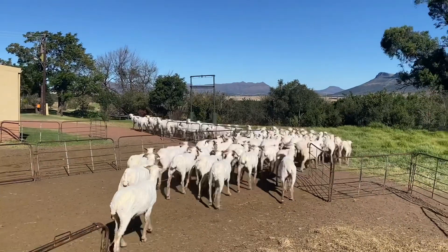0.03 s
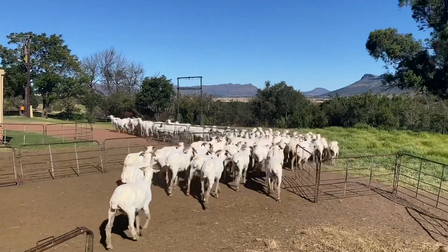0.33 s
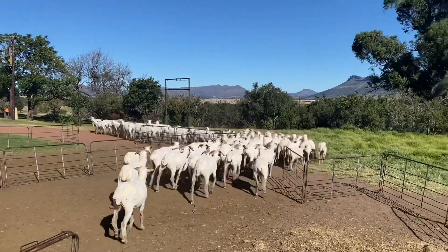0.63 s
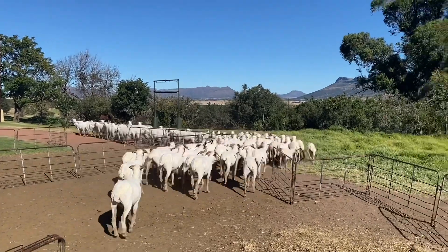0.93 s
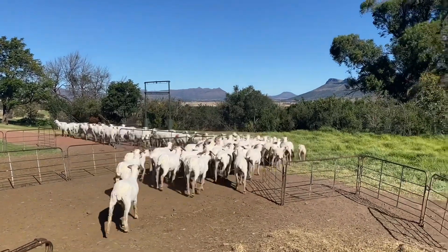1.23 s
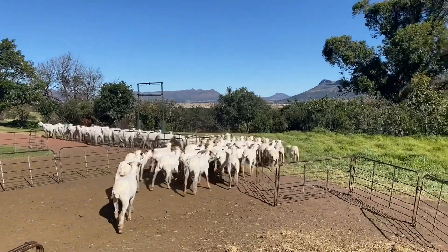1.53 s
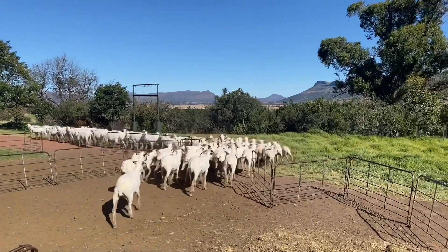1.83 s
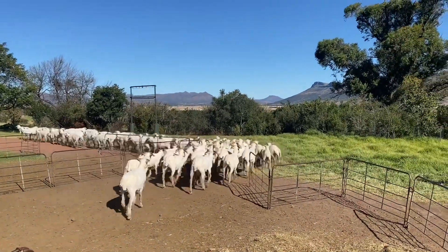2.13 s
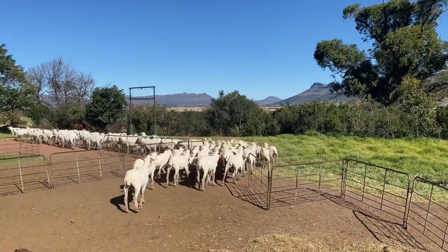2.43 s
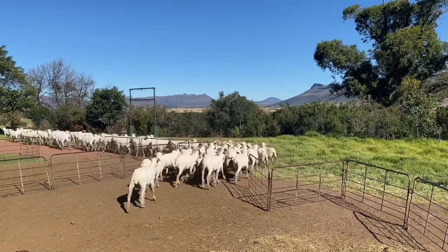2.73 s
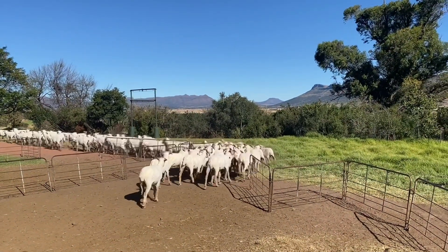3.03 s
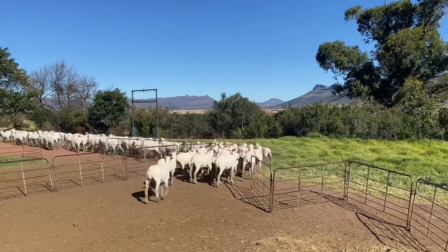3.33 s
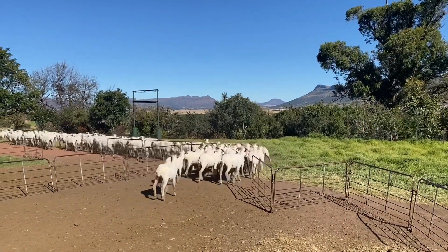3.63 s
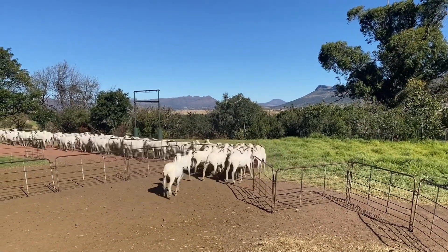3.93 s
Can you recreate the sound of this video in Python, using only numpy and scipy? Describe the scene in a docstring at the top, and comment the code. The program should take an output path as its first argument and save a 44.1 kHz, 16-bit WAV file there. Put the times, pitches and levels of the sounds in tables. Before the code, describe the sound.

A flock of sheep trots off faintly, a steel fence clanking as wind rumbles.

```python
"""A flock of sheep trots away over a dry dirt farmyard, in a faint outdoor hiss and a light wind.
In about the first second, near hooves scuff up grit and the steel fence clanks as the sheep jostle it.
By two seconds the patter has sunk into the hiss; a few scuffs, knocks and pebble ticks still follow.
The wind buffets the microphone throughout and is strongest after three seconds: a low rumble and
eddies (puffs of wind), each a soft thump that falls in pitch."""
import sys
import numpy as np
from scipy import signal
from scipy.fft import rfft, irfft
from scipy.io import wavfile
from scipy.ndimage import uniform_filter1d

SR = 44100
rng = np.random.default_rng(int(sys.argv[2]) if len(sys.argv) > 2 else 0)


def unload_wav(signal):
    """Save mono or channel-first audio to the path in sys.argv[1] as 16-bit WAV at rate SR, clipped to [-1, 1]."""
    wavfile.write(
        sys.argv[1],
        SR,
        np.round(np.clip(np.atleast_2d(signal).T, -1, 1) * 32767).astype(np.int16),
    )


N = 176400
TIME = np.arange(N) / SR


def from_db(db):
    """Turn decibels into a number to multiply by."""
    return 10 ** (np.asarray(db) / 20)


def rms_one(x):
    """Scale a sound to an average power of one."""
    return x / np.sqrt(np.mean(x ** 2) + 1e-20)


def steady(x):
    """Even out the loudness, so that every 50 ms has a power near one."""
    return x / np.sqrt(uniform_filter1d(x ** 2, size=2200) + 1e-20)


def in_time(rows):
    """A volume curve through points of t/s, level/dB."""
    return from_db(np.interp(TIME, *np.transpose(rows)))


def colour(x, points):
    """Shape the tone along a curve of f/Hz, level/dB."""
    hz, db = np.transpose(points)
    bins = np.maximum(np.fft.rfftfreq(N, 1 / SR), 1)
    return irfft(rfft(x) * from_db(np.interp(np.log(bins), np.log(hz), db)), N)


def tremble():
    """A random wobble of typical size one, some tens of times a second."""
    return rms_one(colour(rng.standard_normal(N), [(15, -30), (35, 0), (70, 0), (280, -110)]))


def burst(start, attack, t60):
    """A volume curve that rises straight, then fades by 60 dB in t60 seconds."""
    age = TIME - start
    return np.clip(age / attack, 0, 1) * from_db(-60 * np.clip((age - attack) / t60, 0, 2))


# how much left and right differ (side) against what they share (mid): f/Hz, level/dB
WIDTH = [(60, -43), (250, -33), (700, -1), (1300, -1), (2400, -3), (4400, -8), (6000, -10.5), (8000, 1.5),
         (11000, -3.5), (15000, 2.5)]
def stereo_noise(spectrum):
    """Shaped noise, as wide as the open yard is at each frequency."""
    mid, side = (rms_one(colour(white, spectrum)) for white in rng.standard_normal((2, N)))
    return mid + colour(side, WIDTH) * np.array([[1], [-1]])


# tone of the open air and of a thin hiss above it: f/Hz, level/dB
AIR_TONE = [(25, 1), (80, 18.5), (200, 12.5), (450, 5.5), (850, 8.5), (1100, 4), (1400, 3.5), (1700, -1.5),
            (2100, 3.5), (2900, -4.5), (4400, -0.5), (6000, -3), (7500, -5.5), (11000, -8.5), (15500, -7)]
HISS_TONE = [(2800, -7), (4600, 7), (6000, 0), (7500, 3), (11000, 2.5), (15500, 0)]
# loudness of the thin hiss: t/s, level/dB
HISS_LEVEL = [(0, -70), (.3, -89), (.36, -74), (.55, -83), (1.2, -84), (1.42, -72), (1.55, -76),
              (1.77, -71.5), (1.95, -76), (2.2, -78), (2.55, -73), (2.8, -95), (4, -89)]
def open_air(air_db=-68, flicker_db=2):
    """A steady outdoor hush, and a thin hiss that flickers as it comes and goes."""
    hush = from_db(air_db) * stereo_noise(AIR_TONE)
    flicker = from_db(flicker_db * tremble())
    return hush + in_time(HISS_LEVEL) * flicker * stereo_noise(HISS_TONE)


EDDY_LEAD = 256   # samples of room before an eddy begins
def eddy(top_hz, low_hz, cycles=1.45, rise=1.94, fall=3.86):
    """One wind puff on the microphone, a soft thump falling in pitch."""
    hz = cycles * SR / np.arange(1, 8192)   # pitch is cycles divided by age
    # it swells as the pitch drops past top_hz and fades below low_hz
    swell = np.exp(-.5 * (hz / top_hz) ** rise) / (1 + (low_hz / hz) ** (2 * fall)) ** .5
    # complex numbers let it start anywhere in its wave
    thump = swell / swell.max() * np.exp(-2j * np.pi * cycles * np.log(hz))
    treble_cut = signal.butter(4, 1.407 * top_hz, fs=SR, output="sos")
    return signal.sosfiltfilt(treble_cut, np.pad(thump, (EDDY_LEAD, 0)))


# tone of the wind's rumble: f/Hz, level/dB
RUMBLE_TONE = [(20, -23), (32, -7.5), (45, 2), (68, 5.5), (100, -2), (160, -14), (300, -33), (600, -47),
               (1200, -80)]
def turbulence(rumble_db=-4, eddies_db=-13, spread_db=8, each_size_per_s=35):
    """Churning air at steady strength: a rumble and a stream of small eddies in three sizes."""
    rumble = steady(colour(rng.standard_normal(N), RUMBLE_TONE))
    stream = 0
    for scale in (.5, 1, np.sqrt(2)):
        born = rng.random(N) < each_size_per_s / SR
        strengths = from_db(spread_db * rng.standard_normal(N))
        phases = np.exp(2j * np.pi * rng.random(N))
        thump = eddy(top_hz=331 * scale, low_hz=114 * scale)
        stream += signal.fftconvolve(born * strengths * phases, thump)[:N].real / scale
    return from_db(rumble_db) * rumble + from_db(eddies_db) * rms_one(stream)


# tone of the wind's flutter: f/Hz, level/dB
FLUTTER_TONE = [(120, -3.5), (230, 3), (330, -0.5), (450, -6.5), (600, -11.5), (750, -27.5), (1100, -37),
                (2000, -107)]
# its loudness: t/s, level/dB
FLUTTER_LEVEL = [(0, -77), (.11, -66), (.15, -53.5), (.2, -65.5), (.45, -74), (.49, -44.5), (.54, -69),
                 (1.25, -75.5), (1.39, -56.5), (1.47, -70), (1.6, -61.5), (1.92, -67.5), (2.04, -66.5),
                 (2.1, -68), (2.4, -73), (2.56, -59.5), (2.7, -51), (2.86, -65.5), (3.05, -62), (3.14, -46),
                 (3.2, -41.5), (3.27, -52), (3.42, -52), (3.53, -44), (3.6, -40), (3.71, -54), (3.9, -63),
                 (4, -61.5)]
def flutter(lump_db=3):
    """Fine, fast, lumpy churning in the stronger gusts."""
    lumps = from_db(lump_db * tremble())
    return in_time(FLUTTER_LEVEL) * steady(lumps * colour(rng.standard_normal(N), FLUTTER_TONE))


# strong eddies: t/s, level/dB, starting f/Hz, ending f/Hz
EDDIES = [(0.14, -36, 540, 188), (0.153, -33, 356, 88), (.335, -44, 320, 130), (.380, -43, 260, 101),
          (.476, -31.5, 423, 88), (0.489, -33.5, 505, 222), (.500, -32.5, 260, 64.4),
          (0.54, -25, 285, 80.5), (0.611, -34.5, 148, 65.3), (0.646, -44.5, 343, 150),
          (0.666, -34.5, 140, 56.6), (0.824, -51, 328, 150), (0.873, -37.5, 107, 55),
          (0.716, -41.5, 330, 102), (1.054, -44, 335, 89), (1.295, -49.5, 348, 150),
          (1.354, -35, 188, 58.5), (1.406, -37.5, 284, 112), (1.534, -40.5, 290, 117),
          (1.586, -37.5, 228, 71.4), (1.646, -41.5, 234, 87), (1.987, -39.5, 246, 92),
          (2.018, -33, 320, 70), (2.038, -34, 356, 72), (2.128, -43.5, 340, 117), (2.352, -31.5, 310, 76.4),
          (2.385, -31.5, 280, 92), (2.445, -37, 226, 93.5), (2.542, -36.5, 360, 132),
          (2.579, -34.5, 355, 84), (2.605, -40, 382, 110), (2.639, -31.5, 200, 84), (2.674, -33, 353, 135),
          (2.69, -30.5, 373, 100), (2.74, -45, 398, 140), (3.094, -35.5, 346, 126), (2.784, -28, 430, 195),
          (2.806, -34.5, 467, 89), (3.125, -33.5, 584, 200), (3.136, -35, 484, 171), (3.145, -30, 600, 110),
          (3.182, -19, 514, 98), (3.202, -31, 636, 205), (3.241, -30, 267, 57.4), (3.262, -40.5, 200, 70.4),
          (3.305, -31, 286, 92.5), (3.337, -39, 357, 110), (3.393, -43, 457, 159), (3.436, -35.5, 450, 100),
          (3.474, -32, 470, 112), (3.487, -33.5, 418, 112), (3.518, -22.5, 358, 84), (3.535, -27, 360, 119),
          (3.565, -31, 550, 443), (3.586, -25, 292, 109), (3.592, -21, 395, 140), (3.633, -31.5, 565, 150),
          (3.683, -33.5, 390, 110), (3.700, -31.5, 132, 60), (3.758, -37, 466, 136), (3.799, -26, 90, 56),
          (3.953, -38, 214, 77.5)]
def eddy_thumps(ragged=0.2):
    """Single strong eddies thump on the microphone, their pressure trembling."""
    thumps = np.zeros(N, complex)
    for s, db, top_hz, low_hz in EDDIES:
        start = int(s * SR) - EDDY_LEAD
        phase = np.exp(2j * np.pi * rng.random())
        thump = phase * eddy(top_hz, low_hz)[:N - start]
        thumps[start:start + len(thump)] += from_db(db) * thump
    return thumps * (1 + ragged * (tremble() + 1j * tremble()))


# strength of the gusts, and how unlike the wind is on left and right: t/s, level/dB
GUST_LEVEL = [(0.0, -56), (0.19, -38.5), (0.29, -54.5), (0.56, -32), (0.59, -46), (0.76, -39), (0.8, -56),
              (0.9, -39.5), (1.06, -53.5), (1.09, -43), (1.15, -51.5), (1.32, -52.5), (1.38, -36),
              (1.5, -58), (1.59, -39), (1.95, -56.5), (2.04, -32.5), (2.15, -47), (2.32, -55.5),
              (2.36, -40), (2.56, -39), (2.6, -36), (3.05, -44), (3.21, -29), (3.23, -36.5), (3.5, -29.5),
              (3.52, -28.5), (3.79, -34.5), (3.83, -36.5), (3.9, -58.5), (3.98, -36), (4.0, -50)]
WIND_SIDE = [(0, -4.5), (1.8, -9.5), (2.55, -9.5), (2.72, -29), (4, -86)]
# the microphone's openings dull the eddies: f/Hz, level/dB
OPENING_TONE = [(100, -0.5), (400, 0.5), (600, 1.5), (800, -4), (1100, 9), (2000, -49)]
def wind(thump_side_db=-2, flutter_side_db=11.5):
    """Gusts and eddies reach the microphone's two openings out of step; the flutter differs most."""
    gusts, thumps = in_time(GUST_LEVEL), eddy_thumps()
    mid = colour(gusts * turbulence() + thumps.real, OPENING_TONE) + flutter()
    side = colour(gusts * turbulence() + from_db(thump_side_db) * thumps.imag, OPENING_TONE)
    side += from_db(flutter_side_db) * flutter()
    side *= in_time(WIND_SIDE)
    return np.array([mid + side, mid - side])


def ring(strikes, notes, cycles, beat_hz=24.2):
    """Struck steel rings with many notes, each fading by 60 dB in the given number of cycles."""
    out = np.zeros((2, N))
    age = TIME[:SR]
    for s, db in strikes:
        start = int(s * SR)
        for hz, note_db in notes:
            ear_phase = rng.random((2, 1)) / 2 + rng.random()
            strength_db = rng.normal(0, 1.7)
            twin_hz = hz + beat_hz * rng.uniform(-0.95, 1)   # a close twin makes the note waver
            note = np.sin(2 * np.pi * (hz * age + ear_phase))
            twin = .5 * np.sin(2 * np.pi * (twin_hz * age + rng.random()))
            fade = from_db(db + note_db + strength_db - 60 * age * hz / cycles)
            out[:, start:start + len(age)] += fade * (note + twin)
    return out


# bumps on the fence panel and on the gate frame: t/s, level/dB
PANEL_STRIKES = [(0.441, -56), (0.861, -54), (1.053, -62.5)]
FRAME_STRIKES = [(.621, -57)]
# the notes each rings with: f/Hz, level/dB
PANEL_NOTES = [(2510, -12), (2629, -16), (3607, -16), (4118, -16), (4608, -13), (5125, -2.5), (6060, -10),
               (6170, -6.5), (6305, -8), (6578, -6.5), (6977, -9), (7725, -2)]
FRAME_NOTES = [(1375, -10), (1600, -6.5), (1675, -3), (1815, -3), (2060, -3), (3390, -10)]
def fence():
    """Jostled by the sheep, the steel panel clanks brightly and the gate frame rings lower."""
    return ring(PANEL_STRIKES, PANEL_NOTES, cycles=1220) + ring(FRAME_STRIKES, FRAME_NOTES, cycles=490)


# loudness of the flock's patter: t/s, level/dB
PATTER_LEVEL = [(0, -63.5), (.4, -65.5), (.8, -69.5), (1.4, -68.5), (2.0, -72), (2.7, -69), (3.1, -69),
                (4, -69.5)]
# its tone: f/Hz, level/dB
PATTER_TONE = [(150, 11.5), (400, 6), (700, 9.5), (1100, 3.5), (2000, 2), (3000, -4.5), (4700, -0.5),
               (6500, -45.5), (15000, -26)]
def flock(steps_per_s=140, step_t60_s=0.19, grains_per_s=500, crunch_db=-6.5):
    """Many far hooves, each a small crunching puff of dirt, growing fainter with distance."""
    steps = rng.random(N) < steps_per_s / SR
    steps = steps * from_db(6 * np.clip(rng.standard_normal(N), -2, 2))   # some land harder
    decay = np.exp(-2 * np.log(1000) / (step_t60_s * SR))
    puffs = np.sqrt(signal.lfilter([1], [1, -decay], steps ** 2 + 1e-18))
    grains = rng.random((2, N)) < grains_per_s / SR
    grains = grains * from_db(2.5 * rng.standard_normal((2, N))) * rng.choice([-1, 1], (2, N))
    crunch = rms_one(colour(grains + grains.mean(axis=0), PATTER_TONE))
    dirt = rms_one(stereo_noise(PATTER_TONE)) + from_db(crunch_db) * crunch
    return in_time(PATTER_LEVEL) * rms_one(puffs) * dirt


# cracks, hollow knocks and pebble ticks: t/s, peak level/dB, f/Hz, width/Hz, fade time/s
KNOCKS = [(0.4434, -43, 6000, 9000, 0.053), (0.6208, -38, 900, 750, 0.02),
          (0.6216, -41, 2400, 4000, 0.0043), (0.861, -46.5, 7550, 9000, .045), (1.24, -48.5, 810, 202, 0.1),
          (1.244, -50, 1930, 480, 0.15), (1.361, -54, 1700, 800, 0.048), (1.476, -55, 3500, 3000, 0.038),
          (1.853, -58, 2020, 1100, 0.022), (1.95, -54, 980, 600, .04), (2.18, -52, 565, 280, 0.27),
          (2.853, -49, 7060, 5500, 0.03), (3.012, -47.5, 6860, 3400, 0.021),
          (3.293, -50.5, 6630, 1800, 0.017), (3.374, -57, 1400, 600, 0.042)]
def knocks(attack_s=0.00017):
    """Each hard hit is a snap of noise that rings around one pitch."""
    out, noise = 0, stereo_noise([(100, 0), (10000, 0)])
    for s, db, hz, width_hz, t60 in KNOCKS:
        decay = np.exp(-np.pi * width_hz / SR)
        resonance = [1, 0, -1, 1, -2 * decay * np.cos(2 * np.pi * hz / SR), decay ** 2]
        tick = signal.sosfilt([resonance, resonance], noise * burst(s, attack_s, t60) + 1e-18)
        out += from_db(db) * tick / np.abs(tick).max()
    return out


def rippled(x, depth_db=5, width_hz=27):
    """Add random narrow peaks and dips, giving the noise a slightly ringing tone."""
    hz = np.fft.rfftfreq(N, 1 / SR)
    db = depth_db * np.interp(hz / width_hz, np.arange(2000), rng.standard_normal(2000))
    return irfft(rfft(x) * rms_one(from_db(db)), N)


# tones of a dull earthy, a bright sandy and a fine gritty noise: f/Hz, level/dB
DULL = [(400, 1.5), (800, -9), (1800, -4.5), (2800, -11), (8000, -77)]
BRIGHT = [(1000, -26), (2000, 8), (2900, 13), (3600, 14), (4700, 13.5), (6000, 8), (12000, -27.5)]
FINE = [(3500, -38), (5600, -11), (6400, 14.5), (7100, 20), (7800, 2), (10800, 16), (15000, -16)]
# scuffs and rattles: t/s, rise time/s, fade time/s, dull level/dB, bright level/dB, fine level/dB
SCUFFS_AND_RATTLES = [(0.099, 0.0019, 0.18, -81, -63.5, -86), (.322, 0.016, 0.63, -68.5, -70, -73.5),
                      (0.442, 0.005, 0.44, -61, -55.5, -63), (0.6, 0.0073, 0.7, -61.5, -63.5, -95),
                      (0.715, 0.002, 0.14, -60.5, -84, -83), (0.744, 0.032, 1, -98, -70.5, -73),
                      (.860, 0.0034, 0.35, -99, -55.5, -61), (1.026, .002, 0.27, -66.5, -60.5, -77),
                      (1.052, 0.004, 1, -65.5, -72.5, -85), (2.18, 0.024, 0.34, -67, -71.5, -73),
                      (3.237, 0.0073, 0.075, -63.5, -67.5, -69.5), (3.737, 0.0049, 0.13, -61, -78, -80)]
def scuffs_and_rattles(grain_db=2):
    """Near hoof scuffs, and the bright noisy rattle of the two fence clanks at 0.44 and 0.86 s."""
    grain = rms_one(from_db(grain_db * rms_one(uniform_filter1d(rng.standard_normal(N), size=60))))
    dull, bright, fine = (rippled(stereo_noise(tone)) * grain for tone in (DULL, BRIGHT, FINE))
    out = 0
    for s, attack, t60, dull_db, bright_db, fine_db in SCUFFS_AND_RATTLES:
        noise = from_db(dull_db) * dull + from_db(bright_db) * bright + from_db(fine_db) * fine
        out += burst(s, attack, t60) * noise
    return out


def scene():
    """Add up the open air, the fence, the wind and the hooves."""
    lean_left = from_db([[0.5], [-0.5]])
    return open_air() + fence() + wind() + lean_left * scuffs_and_rattles() + knocks() + lean_left * flock()


def record(dry, low_hz=27.3, high_hz=15800):
    """Cut away the deepest rumble and the highest treble."""
    thinned = signal.sosfilt(signal.butter(4, low_hz, "high", fs=SR, output="sos"), dry)
    return signal.sosfilt(signal.ellip(10, .1, 80, high_hz, fs=SR, output="sos"), thinned)


dry = scene()
out = record(dry)
unload_wav(out)
```